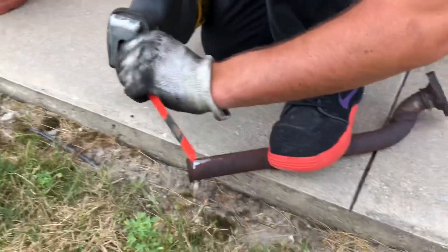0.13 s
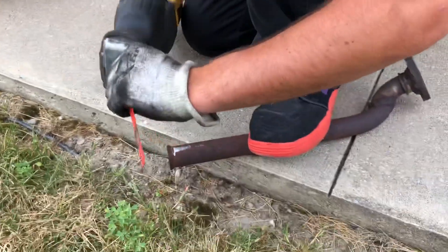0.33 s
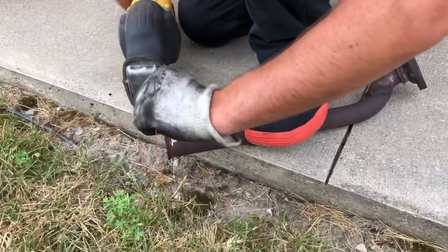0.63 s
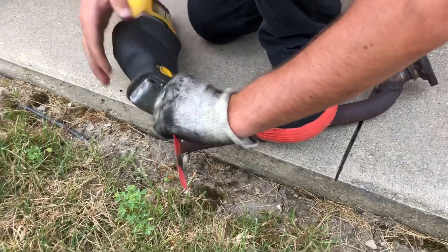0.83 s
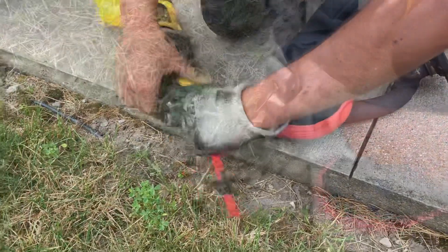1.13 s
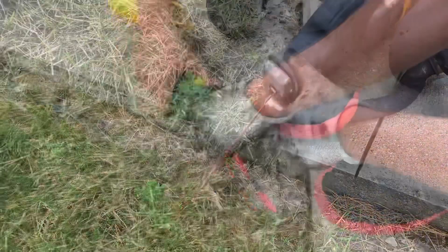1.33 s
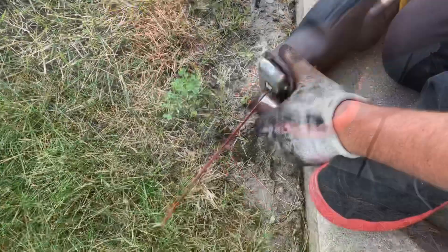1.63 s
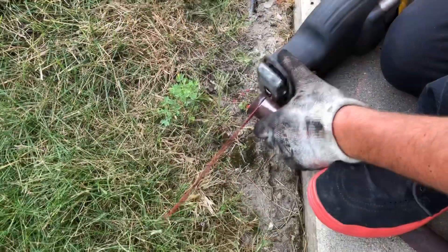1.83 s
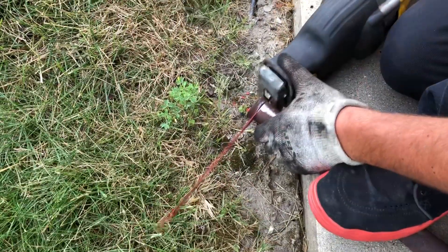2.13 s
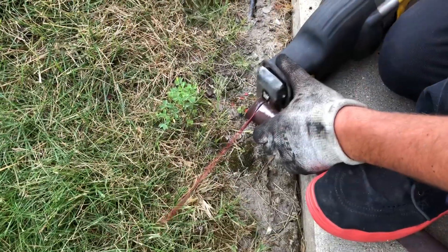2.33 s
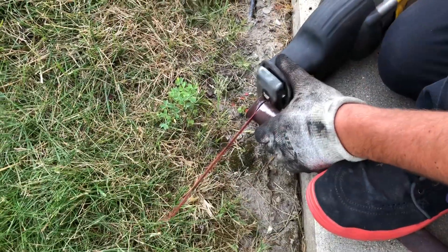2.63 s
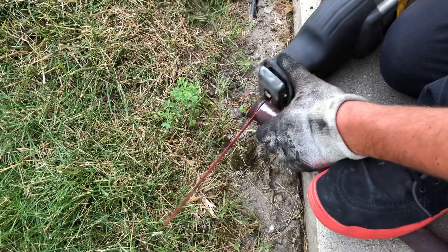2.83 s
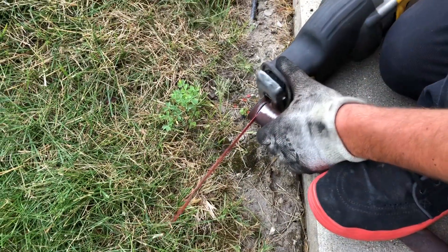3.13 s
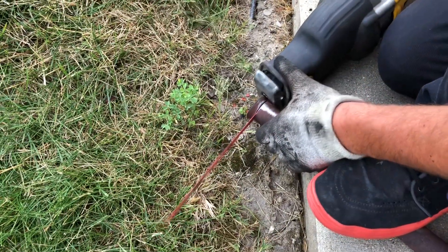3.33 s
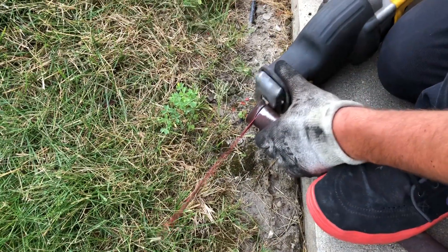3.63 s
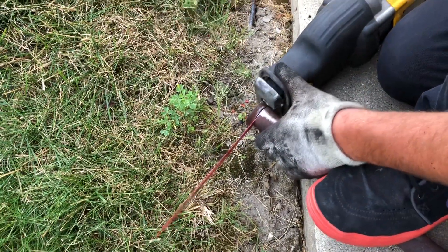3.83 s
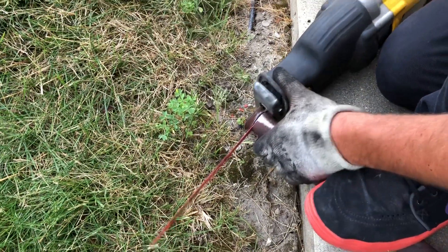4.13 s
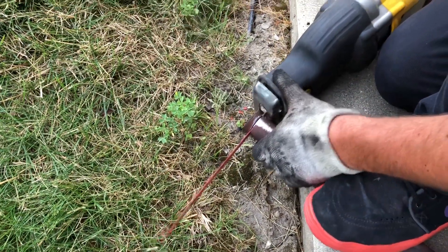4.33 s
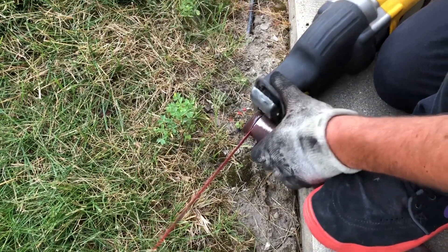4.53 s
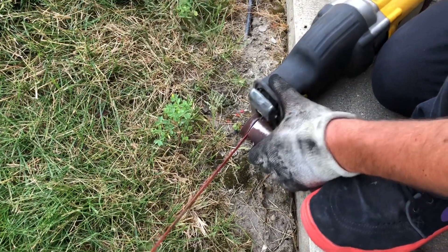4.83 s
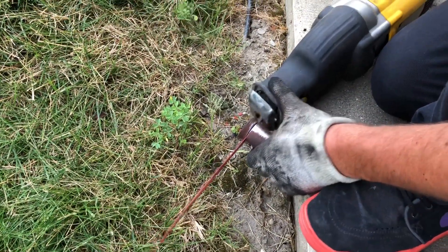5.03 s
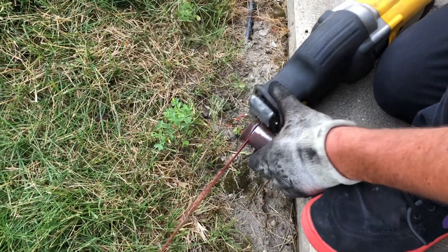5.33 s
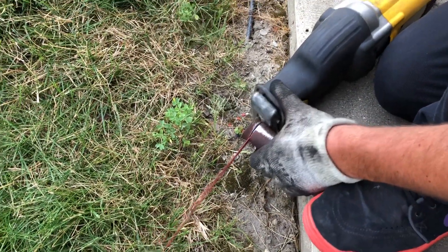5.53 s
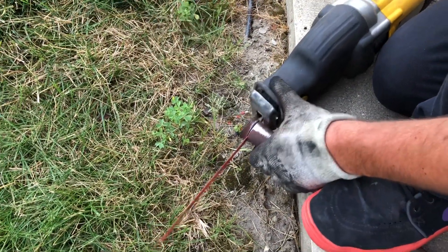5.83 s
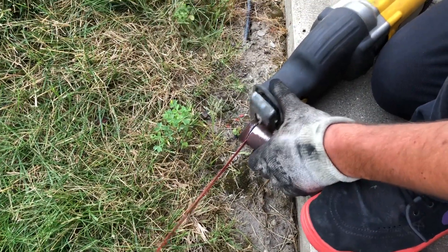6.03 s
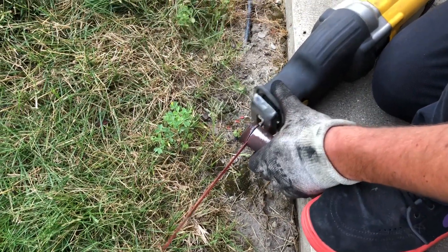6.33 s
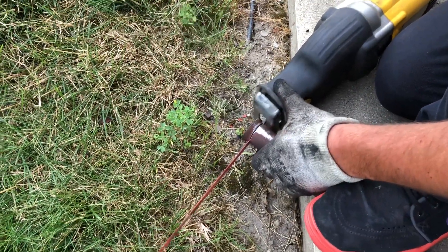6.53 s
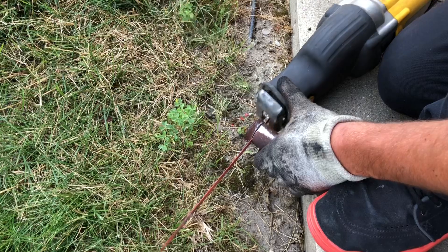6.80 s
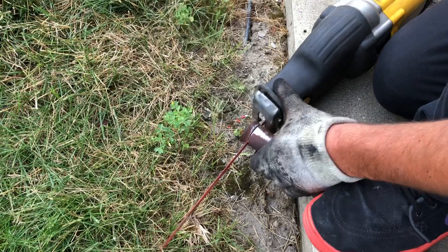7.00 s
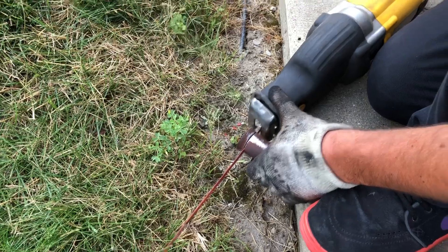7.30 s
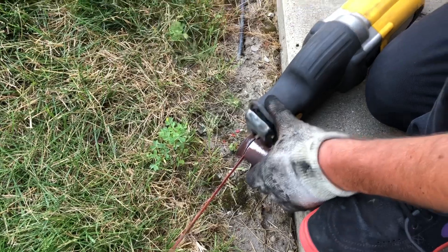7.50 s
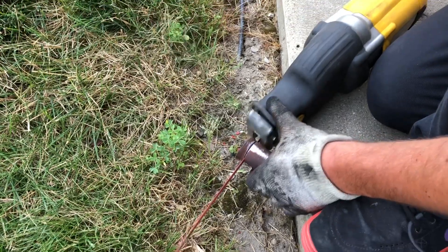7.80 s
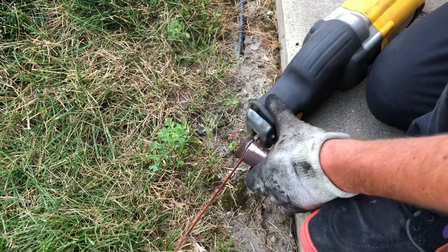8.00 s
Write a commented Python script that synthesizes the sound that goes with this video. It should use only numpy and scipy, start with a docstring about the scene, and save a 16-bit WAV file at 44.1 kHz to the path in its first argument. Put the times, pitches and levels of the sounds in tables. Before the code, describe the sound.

Outdoors, close to the microphone, a glove slides on a saw housing with soft thumps while the blade ticks against a steel pipe. Low wind and two distant bird calls are barely there. After two sharper taps, the reciprocating saw spins up and cuts without stopping: a loud, fast, buzzing rasp under a piercing motor whine that sags with the load. The blade squeaks and whistles, and the pipe clacks and rings when the saw bounces.

```python
"""A reciprocating saw cuts a steel pipe held down on a pavement, close to a mono microphone.
The motor spins up and whines; each stroke rasps, knocks and shakes the pipe, about 84 times a second.
Load sags the speed, the pipe rings when the saw bounces, and the blade squeaks and whistles in the cut.
Before the trigger is pulled, a glove slides on the housing and the blade ticks on the pipe.
Behind it all are a low wind and two calls of a far bird."""
import sys
import numpy as np
from scipy import signal
from scipy.fft import rfft, irfft
from scipy.io import wavfile
from scipy.ndimage import uniform_filter1d, map_coordinates

SR = 44100
rng = np.random.default_rng(int(sys.argv[2]) if len(sys.argv) > 2 else 0)


def output_pcm(signal):
    """Save a mono or channel-first signal as 16-bit PCM at the path in sys.argv[1].

    Samples are clipped to [-1, 1] before scaling.
    """
    pcm = np.clip(np.atleast_2d(signal).T, -1, 1) * 32767
    wavfile.write(sys.argv[1], SR, np.round(pcm).astype(np.int16))


N = 359856
T = np.arange(N) / SR
HZ = np.fft.rfftfreq(N, 1 / SR)


def amp(db):
    """Decibels to gain."""
    return 10 ** (np.asarray(db) / 20)


def unit(x):
    """Scales to rms 1."""
    return x / np.sqrt(np.mean(x ** 2) + 1e-20)


def curves(rows):
    """Each value column of a timed table, at every sample."""
    times, *columns = np.transpose(rows)
    return [np.interp(T, times, c) for c in columns]


def spectrum_db(points):
    """A short spectrum joined on a log-frequency axis."""
    hz, db = np.transpose(points)
    return np.interp(np.log(HZ + 1), np.log(hz + 1), db)


def colour(x, db):
    """Causal filter with the given gain at every frequency."""
    log_gain = np.log(amp(np.maximum(db, -100)))
    mirrored = np.concatenate([log_gain, log_gain[-2:0:-1]])
    return irfft(rfft(x) * np.exp(np.conj(signal.hilbert(mirrored))[:len(HZ)]), N)


def band(x, lo_hz, hi_hz):
    """The part of a sound between two frequencies."""
    return irfft(rfft(x) * (HZ > lo_hz) * (HZ < hi_hz), N)


def drift(rate_hz):
    """Smooth random wander of rms 1."""
    return unit(irfft(rfft(rng.standard_normal(N)) / (1 + (HZ / rate_hz) ** 4), N))


def peak(hz, centre_hz, width_hz):
    """The shape of a resonance, 1 at its centre."""
    return 1 / (1 + (2 * (hz - centre_hz) / width_hz) ** 2)


def resonate(x, hz, width_hz):
    """Two passes through a resonance that follows a pitch curve, scaled to rms 1."""
    turn = np.exp(2j * np.pi * np.cumsum(hz * np.ones(len(x))) / SR)
    pole = np.exp(-np.pi * width_hz / SR)
    for _ in range(2):
        x = 2 * (turn * signal.lfilter([1 - pole], [1, -pole], x / turn + 1e-18)).real
    return unit(x)


def add(mix, start, sound):
    """Lays a sound into the mix at a time in seconds."""
    part = mix[max(round(start * SR), 0):][:len(sound)]
    part += sound[:len(part)]


def bout(start, length, fade_s):
    """Gain of one bout: attack, hold, release."""
    return np.clip(np.minimum(T - start, start + length - T) / fade_s, 0, 1)


def per_stroke(strokes):
    """One random value between -1 and 1 for each stroke, held through it."""
    return np.tanh(rng.standard_normal(1024)[np.floor(strokes).astype(int) % 1024])


# open air over the pavement: (frequency [Hz], relative density [dB])
WIND = [(15, -39), (25, -24), (86, -4), (207, -9), (237, -16), (278, -12.5), (309, -21), (394, -24),
        (1060, -27.5), (10600, -44.5), (15000, -52)]


def wind(level_db=-53, calm_db=-12):
    """Low wind at the microphone, settling as the cut begins."""
    settling_db = np.interp(T, [1.1, 1.75], [0, calm_db])
    return amp(level_db + settling_db) * unit(colour(rng.standard_normal(N), spectrum_db(WIND)))


# calls from far off: (start [s], length [s], top pitch [Hz], level [dB])
BIRD_CALLS = [(0.183, 0.13, 3560, -62), (0.608, 0.09, 3600, -62)]


def bird(arch=0.18, blur_hz=250):
    """A distant bird, each faint call rising and falling in one arch."""
    out = np.zeros(N)
    for start, length, hz, db in BIRD_CALLS:
        bow = np.sin(np.linspace(0, np.pi, int(length * SR)))
        pitch = hz * (1 + arch * (bow - 1))
        add(out, start, amp(db) * bow * resonate(rng.standard_normal(len(bow)), pitch, blur_hz))
    return out


# soft thumps of the saw in the hands: (time [s], level [dB], centre [Hz])
THUMPS = [(0.407, -43, 183), (0.428, -42, 85), (0.553, -40, 151), (.575, -40, 80), (0.635, -43, 129),
          (0.799, -44.5, 169), (0.825, -36, 65), (0.996, -41, 185), (1.039, -50, 210), (1.059, -49, 85)]
# slides of the glove on the housing: (start [s], length [s], centre [Hz], level [dB])
GLOVE_SLIDES = [(.26, .22, 4970, -57), (.38, 0.21, 5000, -58.5), (.56, 0.27, 2400, -59.5),
                (0.713, .035, 4400, -50.5)]


def handling(swell_s=0.0072, glove_width_hz=3600, fizz_db=-9):
    """Dull thumps and the hiss of the glove as the saw is put in place near the microphone."""
    out, t = np.zeros(N), np.arange(SR // 8) / SR
    for start, db, hz in THUMPS:
        push = resonate(rng.standard_normal(len(t)), hz, width_hz=hz)
        add(out, start, amp(db) * push * t / swell_s * np.exp(1 - t / swell_s))
    for start, length, hz, db in GLOVE_SLIDES:
        bow = np.hanning(int(length * SR))
        rub, fizz = rng.standard_normal((2, len(bow)))
        add(out, start, amp(db) * bow * (resonate(rub, hz, glove_width_hz) + amp(fizz_db) * fizz))
    return out


# blade and shoe set on the pipe: (time [s], peak [dB], dull ring [dB], bright ring [dB])
TAPS = [(0.052, -42, 0, -18), (0.166, -38.5, -4, 18), (.451, -38, -11, 4), (0.559, -30.5, -2, -5),
        (.565, -22, -17, -5), (.725, -41, -8, 8), (0.997, -19, -1.5, -14), (1.044, -13, 2, -34)]
# modes of the held-down pipe: (frequency [Hz], relative level [dB], t60 [s])
PIPE_MODES = [(310, -27, 0.052), (543, -6, 0.046), (1010, 1, 0.026), (1200, 8, 0.013), (1400, -2, 0.022),
              (1760, 6, 0.0099), (2600, 5, 0.015), (4070, 2, 0.012), (5290, -15, .02), (7950, -2, 0.03),
              (9250, -2, .012), (10450, -2, .008), (12450, -2, .015)]


def taps(scuff_s=0.0032, crack=0.76, split_hz=4500):
    """Steel touches steel, close by: a short scuff rings the pipe's damped modes."""
    out, t = np.zeros(N), np.arange(SR // 8) / SR
    for start, peak_db, dull_db, bright_db in TAPS:
        ring = 0
        for hz, db, t60 in PIPE_MODES:
            mode_db = db + (dull_db if hz < split_hz else bright_db)
            ring += amp(mode_db - 60 * t / t60) * np.sin(2 * np.pi * hz * t)
        scuff = rng.standard_normal(len(t)) * np.exp(-t / scuff_s)
        tap = unit(signal.fftconvolve(scuff, ring)[:len(t)]) + crack * amp(bright_db) * unit(scuff)
        add(out, start, amp(peak_db) * tap / abs(tap).max())
    return out


# bouts of squeaking, which end once the cut is deep: (start [s], length [s], level [dB])
SQUEAKS = [(1.3, 1.45, -34), (2.895, 0.653, -23), (3.6, 1.55, -30.5), (5.125, .96, -26.5)]


def squeak(strokes, hz=10640, width_hz=650, place=0.21, length=0.071, uneven_db=6.5):
    """Once a stroke the blade sticks and slips against the side of the cut."""
    level = sum(amp(db) * bout(start, span, fade_s=0.075) for start, span, db in SQUEAKS)
    cycle = strokes - place + .5
    gate = np.exp(-((cycle % 1 - .5) / length) ** 2) * amp(uneven_db * per_stroke(cycle))
    return level * resonate(gate * rng.standard_normal(N), hz, width_hz)


# fuzzy whistles of the blade: (start [s], length [s], from [Hz], to [Hz], level [dB])
WHISTLES = [(0.92, 0.84, 11600, 10350, -26.5), (2.35, 0.87, 11300, 10100, -27.5),
            (3.24, 0.93, 10250, 9200, -33), (2.37, .8, 7000, 6800, -32), (3.6, 2.74, 7260, 6970, -31.5),
            (6.68, .16, 7060, 6950, -25.5), (3.07, 0.6, 4100, 3650, -34), (4.3, 0.51, 4400, 4480, -37)]


def whistles(scrape, width_hz=520, fade_share=0.46):
    """The scraping feeds narrow resonances, most of which sink as the blade goes deeper."""
    out = np.zeros(N)
    for start, length, from_hz, to_hz, db in WHISTLES:
        hz = np.interp(T, [start, start + length], [from_hz, to_hz])
        out += amp(db) * bout(start, length, fade_share * length) * resonate(scrape, hz, width_hz)
    return out


# how the saw sits in the cut: (time [s], slack [0-1])
SLACK = [(1.02, 0.73), (1.12, 0.94), (1.6, 0.9), (1.78, 0.34), (3.7, 0.03), (3.9, 0.43), (5.12, 0.53),
         (5.25, 0.79), (5.58, 0.77), (5.8, 0.45), (7.2, 0.28), (8.1, 0.4)]


def looseness():
    """Slack at every sample: 0 when the saw bites firmly, 1 when it bounces."""
    return curves(SLACK)[0]


def slapping(strokes, place=0.686, decay=0.18, rise=0.025, uneven_db=1.0):
    """Force of the shoe landing on the pipe once a stroke; timings are in strokes."""
    since = strokes - place
    blow = (1 - np.exp(-(since % 1) / rise)) * np.exp(-(since % 1) / decay)
    return blow * amp(uneven_db * per_stroke(since)) * teeth(strokes)


def pipe_ring(slaps, hz=1245, width_hz=150, level_db=-43, slack_db=15):
    """The slaps ring the pipe wall, most when the saw bounces."""
    return amp(level_db + slack_db * looseness() ** 2) * resonate(slaps, hz, width_hz)


# the shoe clacking on the pipe: (frequency [Hz], relative density [dB])
CLACK = [(40, -62), (200, -25.5), (420, -5), (800, -2.5), (1050, 0.5), (1260, -3.5), (1600, 2.5),
         (2000, -1.5), (2700, 4.5), (4000, -11), (7000, -41)]


def clack(slaps, offset_db=-3.0):
    """The slaps are heard as clacks when the saw bounces, louder with a harder bite."""
    rasp_db, _ = curves(BITE)
    return amp(rasp_db + offset_db) * looseness() ** 2 * unit(colour(slaps, spectrum_db(CLACK)))


# each way the saw seats itself on the pipe tunes two resonances:
# (start [s], hum [dB], low resonance [Hz], low lift [dB], high resonance [Hz], even orders [dB])
SEATS = [(.92, -38.5, 400, 6.5, 1235, -2.5), (1.7, -33, 420, 3, 827, -1),
         (3.72, -36.5, 440, 3.5, 760, -2.5), (5.18, -37.5, 494, 9.5, 790, -3), (5.65, -38, 503, 11, 895, 0),
         (6.05, -38.5, 430, 6.5, 930, -8), (6.93, -37.5, 400, 5.5, 1470, 2),
         (7.42, -36.5, 477, 10.5, 1450, 4)]
# what saw and pipe radiate when shaken: (frequency [Hz], relative level [dB])
RADIATION = [(85, -17.5), (170, -12), (250, -2.5), (310, -1.5), (450, -0.5), (600, -5), (770, 0),
             (1030, -2), (1250, 4), (1450, -2)]


def shaking(strokes, low_width_hz=110, high_db=10, high_width_hz=150, waver_db=2.14, orders=17):
    """Saw and pipe hum at multiples of the stroke rate; even ones fade when push and pull are alike."""
    starts, *columns = np.transpose(SEATS)
    seat = np.maximum(np.searchsorted(starts, T) - 1, 0)
    level_db, low_hz, low_db, high_hz, even_db = [uniform_filter1d(c[seat], SR // 16) for c in columns]
    stroke_hz = np.gradient(strokes) * SR
    hum = power = 0
    for k in range(1, orders + 1):
        hz = k * stroke_hz
        radiated_db = np.interp(hz, *np.transpose(RADIATION))
        lift_db = low_db * peak(hz, low_hz, low_width_hz) + high_db * peak(hz, high_hz, high_width_hz)
        height = amp(radiated_db + lift_db + even_db * (k % 2 == 0) + waver_db * drift(3.3))
        hum += height * np.cos(2 * np.pi * (k * strokes + rng.random()))
        power += height ** 2
    return amp(level_db) * unit(hum / np.sqrt(uniform_filter1d(power, SR // 4)))


def teeth(strokes, memory=0.91, worn_share=0.25, grain_db=2.0, burr_count=512):
    """The teeth meet nearly the same burrs on each stroke: a slowly wearing pattern, plus fresh chips."""
    wear = rng.standard_normal((int(strokes[-1]) + 2, burr_count))
    burrs = signal.lfilter([1], [1, -memory], wear, axis=0)
    worn = unit(map_coordinates(burrs.ravel(), [strokes * burr_count], order=3))
    chips = unit(rng.standard_normal(N) * amp(grain_db * np.tanh(drift(1200))))
    return np.sqrt(worn_share) * worn + np.sqrt(1 - worn_share) * chips


# knocks within one stroke: (place [0-1], decay [strokes], when biting [dB], when slack [dB])
KNOCKS = [(0.138, 0.3, 8, 6), (0.418, 0.14, -4, -8), (.67, .08, 6, -1), (.81, 0.097, 5, 20.5)]


def pressure(strokes, rub_db=2.0, jitter=0.0037, onset_s=0.0014):
    """Force on the blade: steady rubbing, and knocks as it turns round and catches."""
    slack = looseness()
    power = amp(rub_db) ** 2
    uneven_db = 2.8 - 1.5 * slack
    for place, decay, bite_db, slack_db in KNOCKS:
        since = strokes - place + jitter * drift(82)
        blow_db = bite_db + slack * (slack_db - bite_db) + uneven_db * per_stroke(since)
        power += amp(blow_db) ** 2 * np.exp(-(since % 1) / decay)
    power = uniform_filter1d(power, int(onset_s * SR) + 1)  # each catch takes a moment to build
    return np.sqrt(power / uniform_filter1d(power, SR // 8))


# how hard the teeth bite: (time [s], rasp [dB], treble against rasp [dB])
BITE = [(1.75, -24.5, 3), (1.87, -23, 3.5), (5.71, -24, 3.5), (7.07, -26, 3), (8.05, -23.5, 1.5)]
# scraped steel at close range: (frequency [Hz], relative density [dB])
STEEL = [(88, -32), (150, -21), (210, -23), (248, -20.5), (288, -17.5), (427, -12), (544, -11.5),
         (1070, -7), (1240, -6), (1760, -2), (2330, 0.5), (4160, -2), (7150, -1), (11600, -5.5),
         (13000, -5)]
# resonances of blade and housing: (centre [Hz], width [Hz], lift [dB])
BLADE_MODES = [(1455, 103, 4), (1757, 280, -4), (2285, 360, 2), (2690, 430, 2.5), (3140, 130, -5.5),
               (3400, 1100, 2.5), (4230, 135, -8), (4230, 170, 5.5), (4870, 105, -3.5), (5350, 150, 2),
               (5240, 150, 3), (6150, 760, 4), (7080, 300, 2.5), (8290, 1400, 4.5), (10750, 1300, 4),
               (11300, 710, -7), (11900, 320, 5)]


def rasp(scrape, top_db=-11, split_hz=4600, top_hz=9600):
    """The scraping rings in blade and housing; the bite sets its level and brightness."""
    level_db, bright_db = curves(BITE)
    modes_db = sum(db * peak(HZ, hz, width) for hz, width, db in BLADE_MODES)
    steel = colour(scrape, spectrum_db(STEEL) + modes_db)
    # each band is scaled by the strength of its core
    body = band(steel, 0, split_hz) / band(steel, 1800, 4500).std()
    treble = band(steel, split_hz, top_hz) / band(steel, 4800, 9500).std()
    top = band(steel, top_hz, SR / 2) / band(steel, 11300, 12800).std()
    return amp(level_db) * (body + amp(bright_db) * (treble + amp(top_db) * top))


# the motor's speed, sagging under load: (time [s], whine pitch [Hz])
MOTOR_SPEED = [(0.96, 13696), (1.08, 13615), (1.26, 13944), (1.5, 14030), (1.88, 14573), (2.64, 15273),
               (2.9, 15396), (3.26, 15072), (3.76, 15035), (4.4, 14183), (4.52, 14408), (4.83, 14632),
               (5.58, 13742), (5.85, 14626), (6.02, 14546), (6.19, 14659), (6.85, 14509), (7.03, 13917),
               (7.23, 13999), (7.55, 13250), (7.65, 13361), (7.83, 14320), (7.93, 14668), (8.15, 14661)]


def whine(strokes, level_db=-13.5, loudest_hz=14620, off_peak_db=-5, slack_db=-4.0,
          sag_hz=14, flutter_hz=9, throb_db=0.7, waver_db=0.83, fuzz_db=-20):
    """The motor's piercing tone: loudest at one speed, weaker as the saw bounces, tugged each stroke."""
    hz, = curves(MOTOR_SPEED)
    tug = np.cos(2 * np.pi * strokes)
    pitch = hz - sag_hz * tug + flutter_hz * drift(131)
    tone = np.sqrt(2) * np.cos(2 * np.pi * np.cumsum(pitch) / SR)
    fuzz = resonate(rng.standard_normal(N), hz, width_hz=380)
    detuned = 1 - peak(hz, loudest_hz, width_hz=1000)
    slow_db = level_db + off_peak_db * detuned + slack_db * looseness() ** 2
    return amp(slow_db + throb_db * tug + waver_db * drift(45)) * (tone + amp(fuzz_db) * fuzz)


def saw(trigger_s=0.92, bite_s=0.68, spin_up_s=0.92, cycles_per_stroke=174.3, skid=3.5, low_hz=55):
    """The saw, close up: one motor drives whine and strokes, and both swell from the trigger."""
    strokes = np.cumsum(curves(MOTOR_SPEED)[0] / cycles_per_stroke) / SR
    scrape = np.tanh(teeth(strokes) * pressure(strokes) / skid)  # a tooth skids under too much force
    slaps = slapping(strokes)
    ringing = whistles(scrape) + pipe_ring(slaps) + squeak(strokes)
    cutting = rasp(scrape) + clack(slaps) + shaking(strokes) + ringing
    biting_in = np.clip((T - trigger_s) / bite_s, 0, 1)
    spinning_up = np.clip((T - trigger_s) / spin_up_s, 0, 1)
    bass_cut = signal.butter(4, low_hz, "high", fs=SR, output="sos")  # a small tool has no deep bass
    return signal.sosfilt(bass_cut, biting_in * cutting + spinning_up * whine(strokes))


def scene():
    """One microphone by the pipe hears everything, the same in both channels."""
    return np.tile(saw() + taps() + handling() + wind() + bird(), (2, 1))


def record(dry, low_hz=40, high_hz=15800):
    """The recorder's bass cut and band limit."""
    thinned = signal.sosfilt(signal.butter(4, low_hz, "high", fs=SR, output="sos"), dry)
    band_limit = signal.firwin(511, high_hz, window=("kaiser", 9), fs=SR)
    return signal.oaconvolve(thinned, band_limit[None], "same")


dry = scene()
out = record(dry)
output_pcm(out)
```